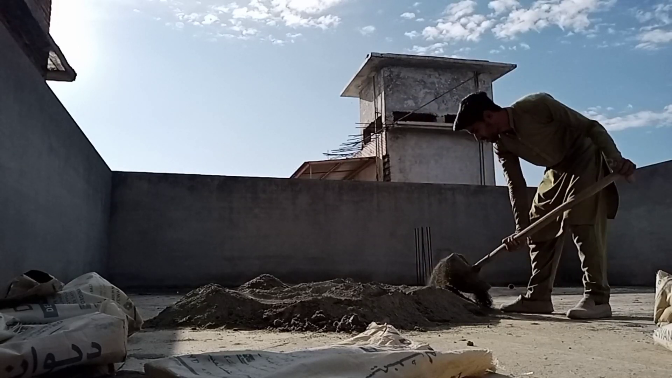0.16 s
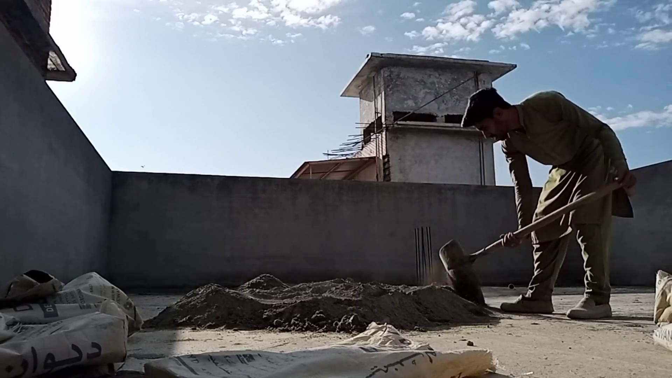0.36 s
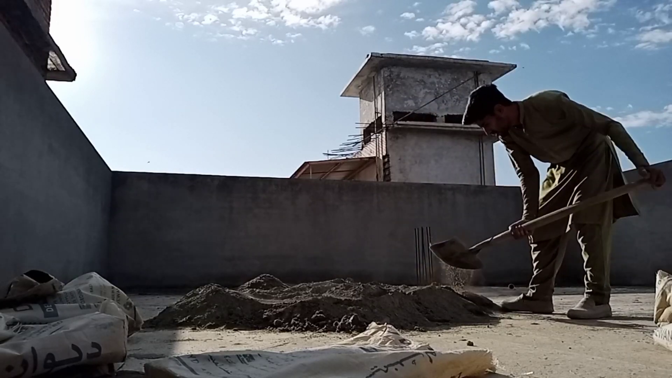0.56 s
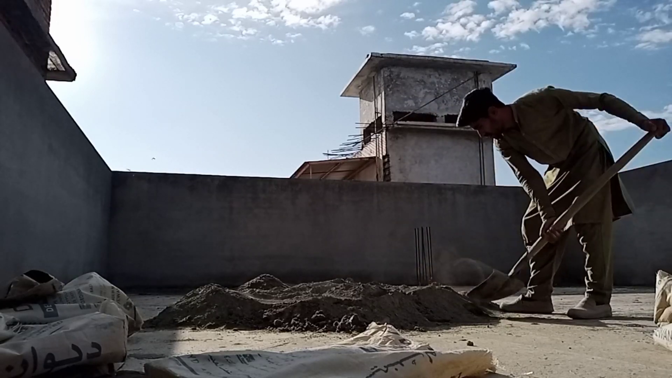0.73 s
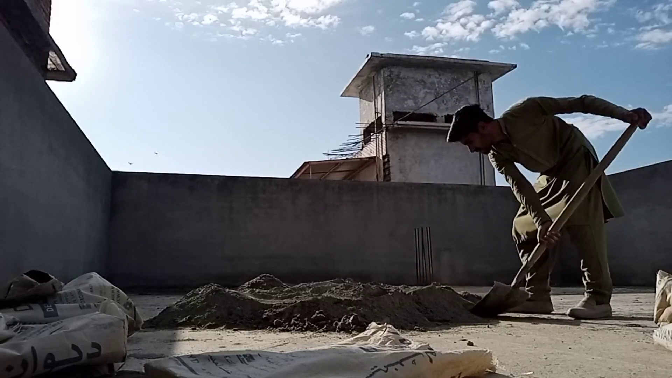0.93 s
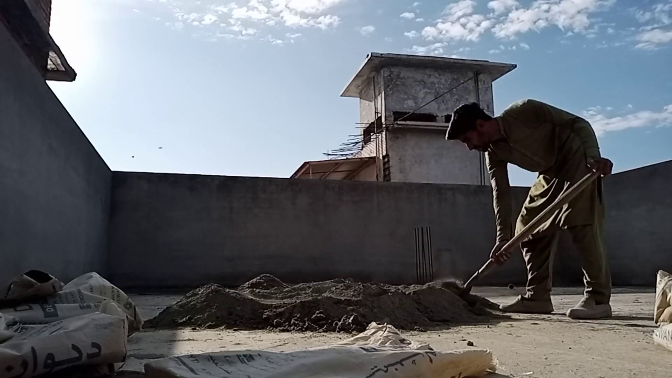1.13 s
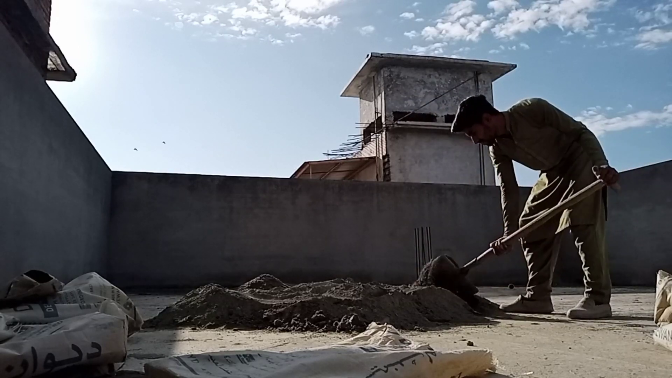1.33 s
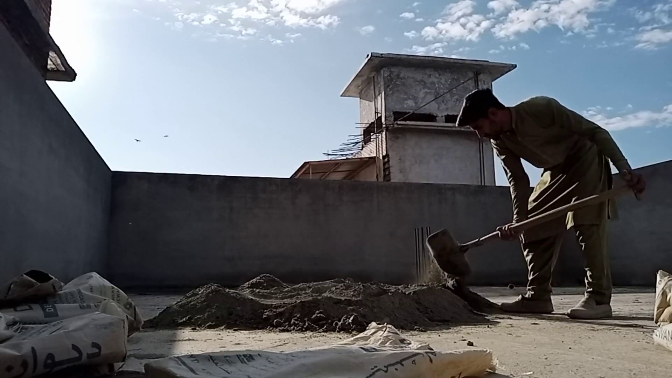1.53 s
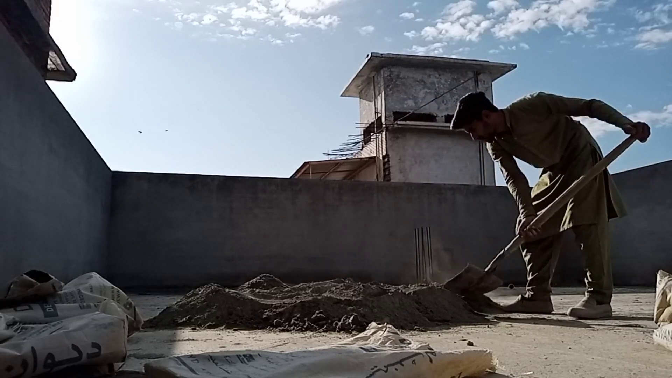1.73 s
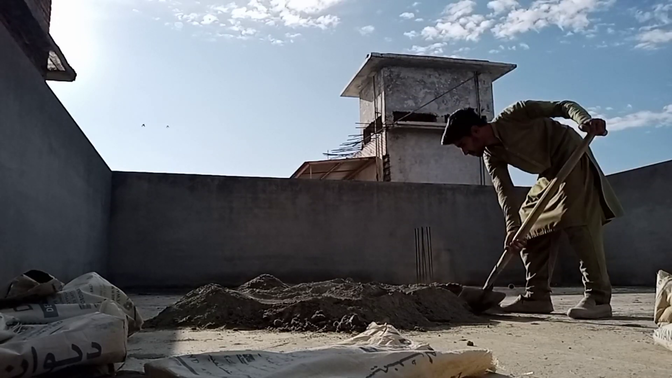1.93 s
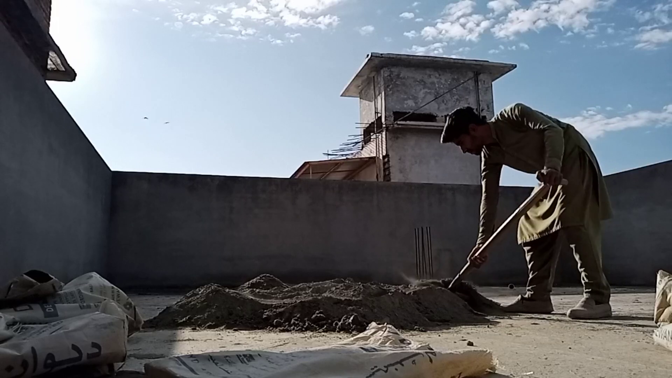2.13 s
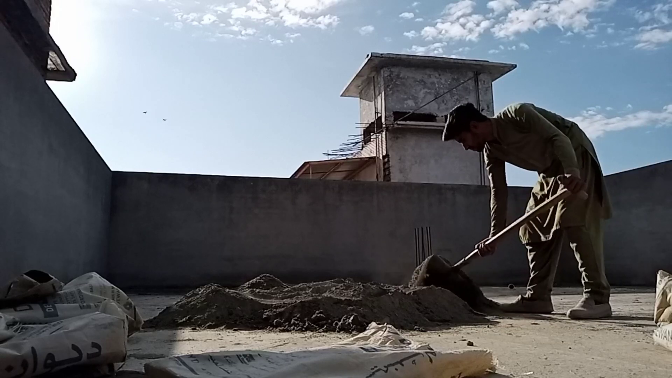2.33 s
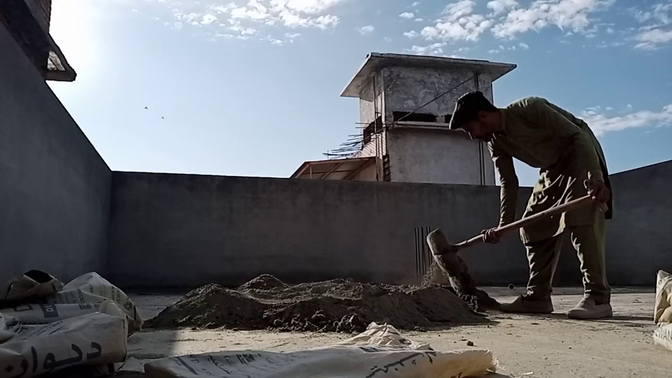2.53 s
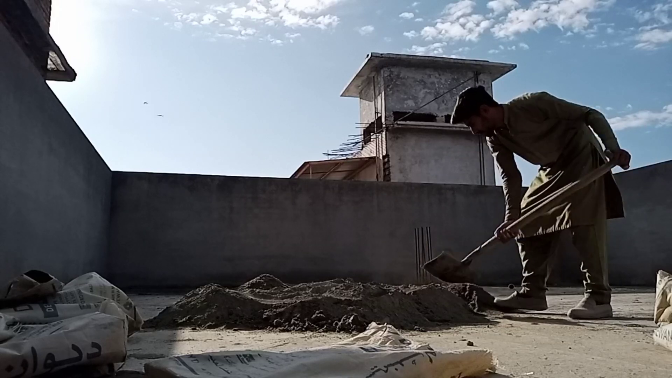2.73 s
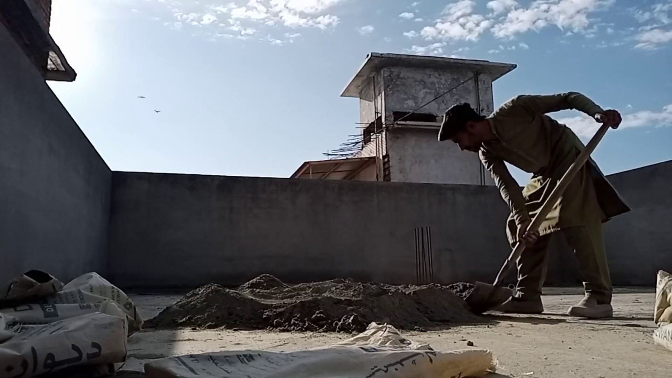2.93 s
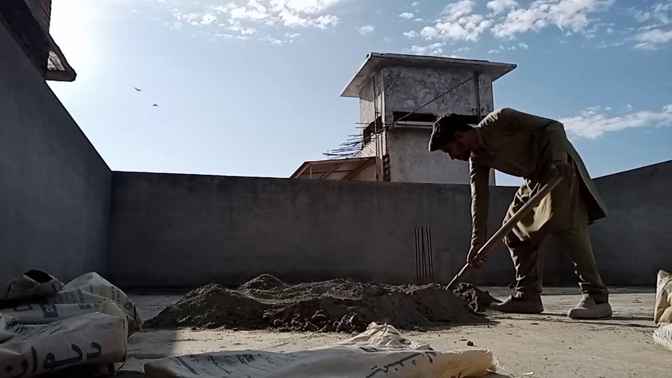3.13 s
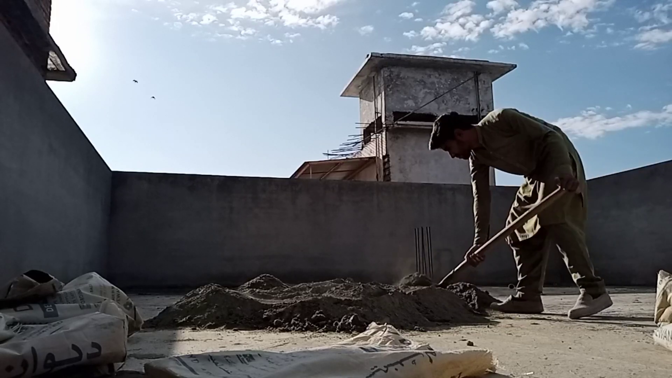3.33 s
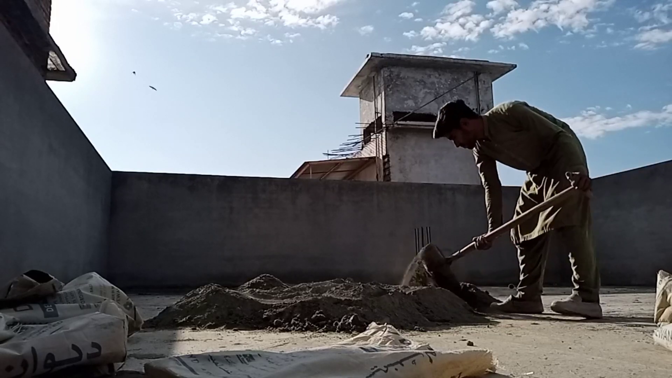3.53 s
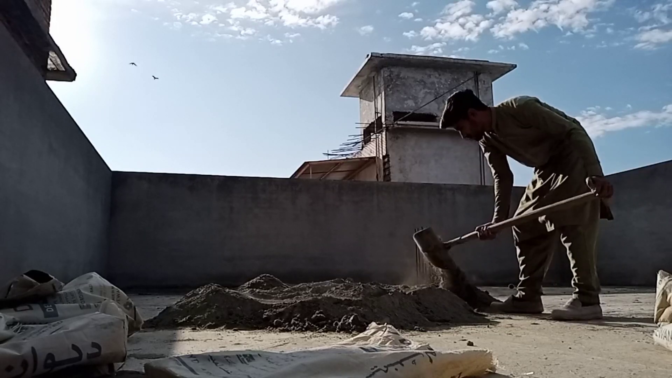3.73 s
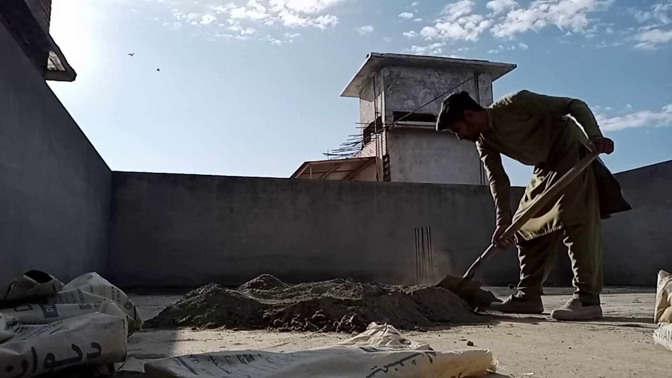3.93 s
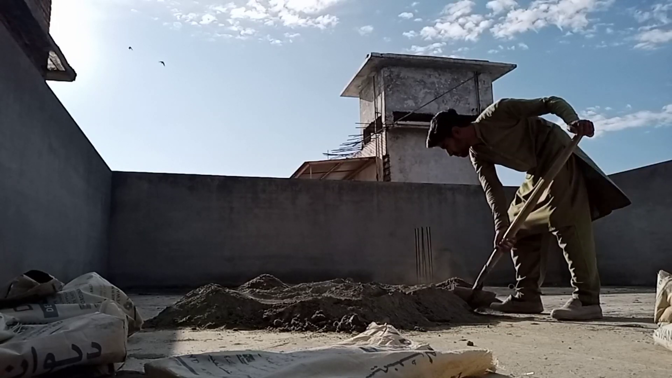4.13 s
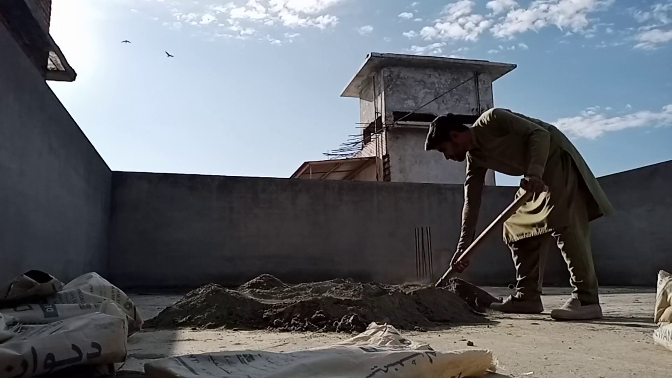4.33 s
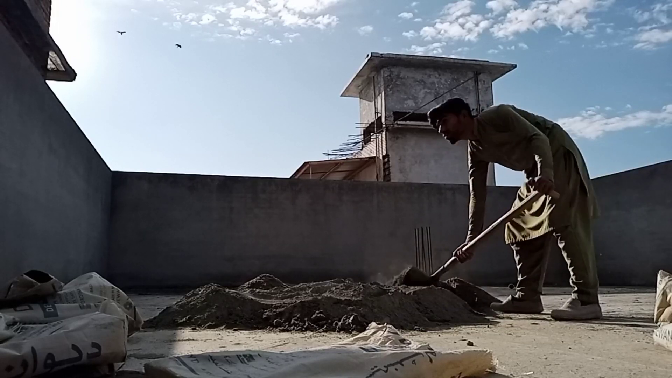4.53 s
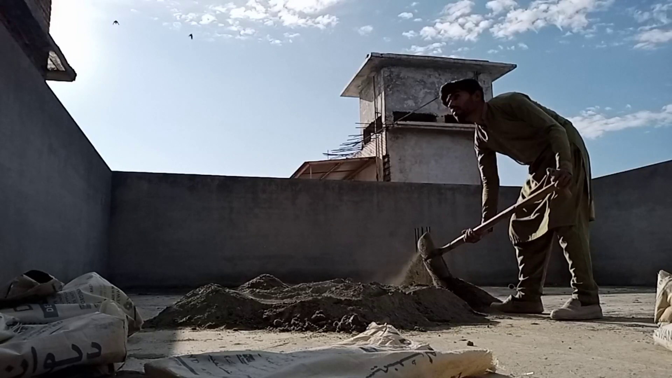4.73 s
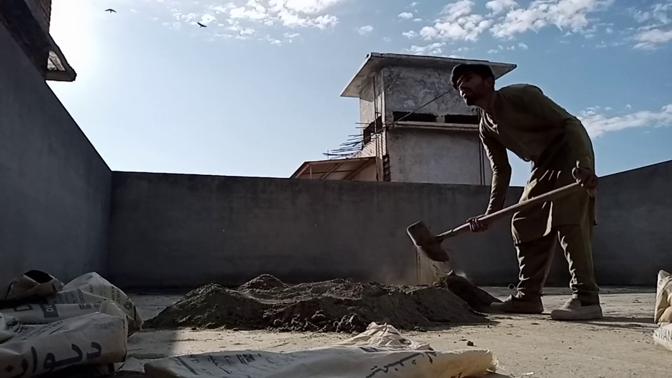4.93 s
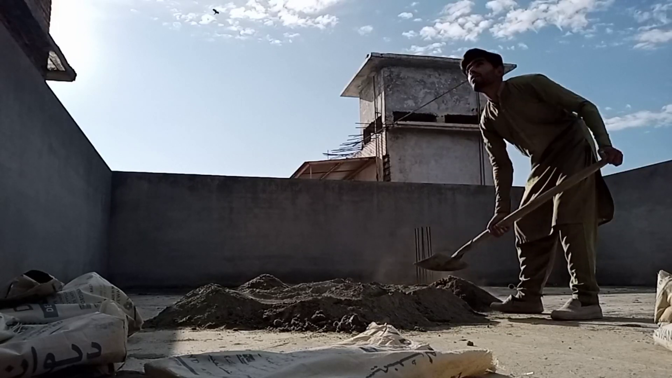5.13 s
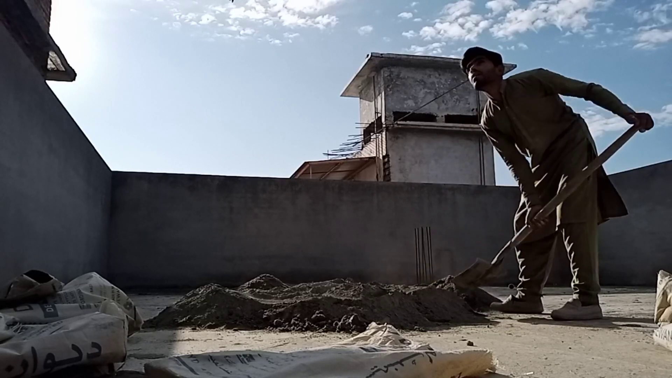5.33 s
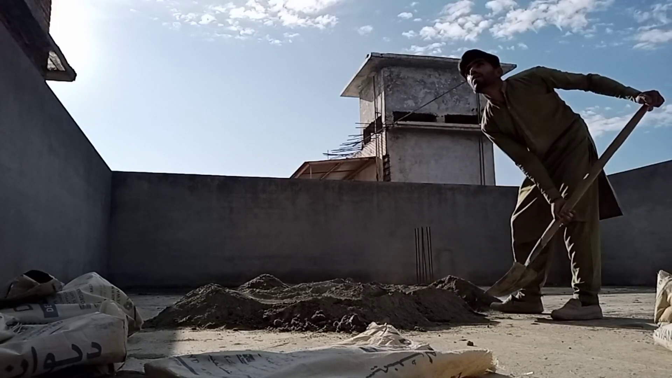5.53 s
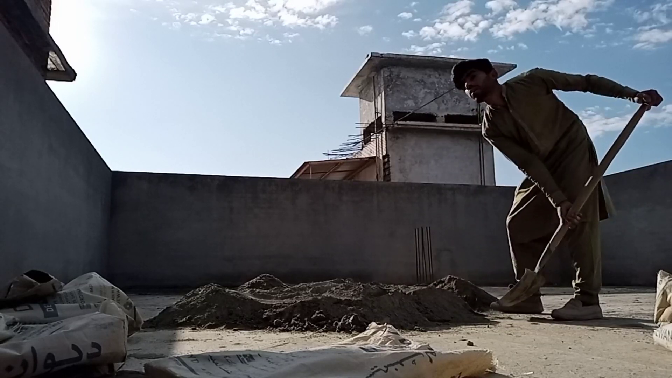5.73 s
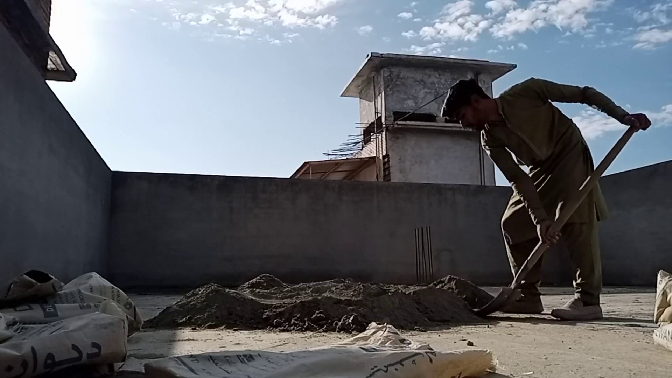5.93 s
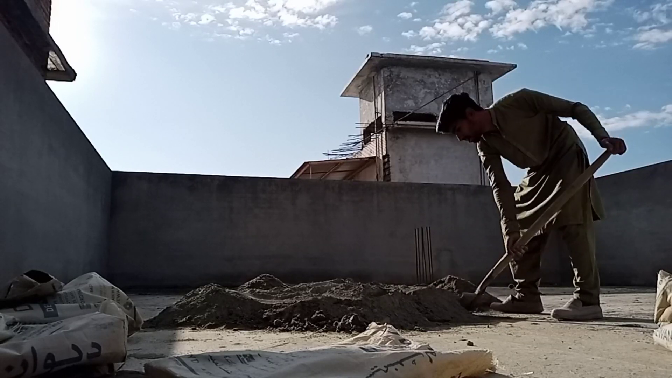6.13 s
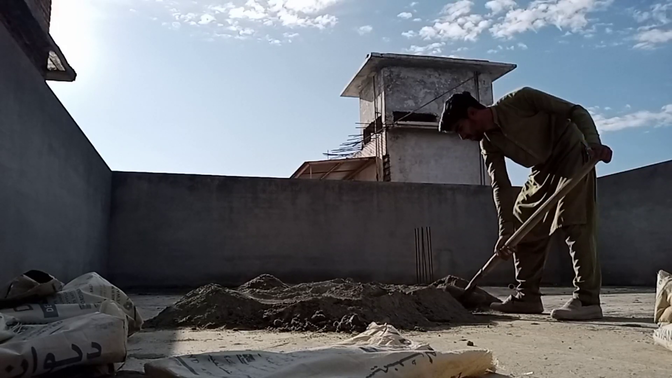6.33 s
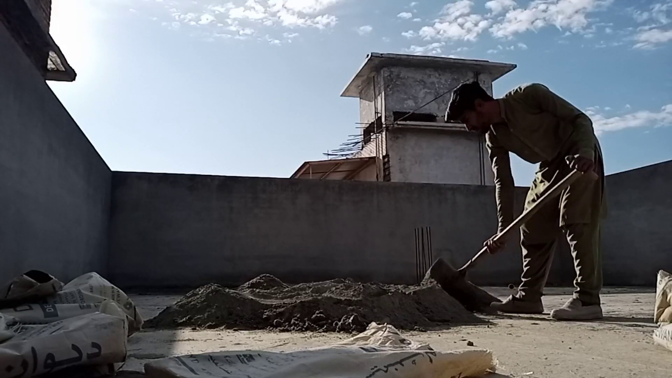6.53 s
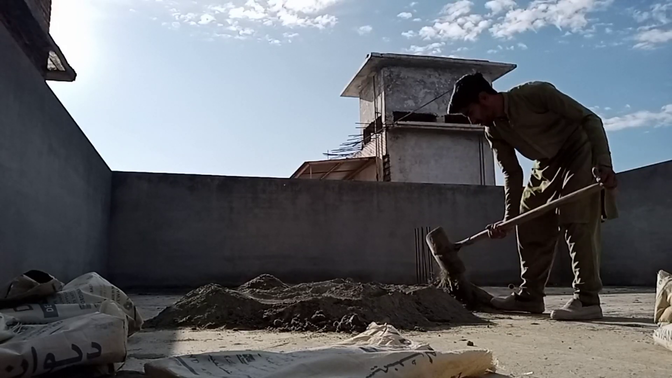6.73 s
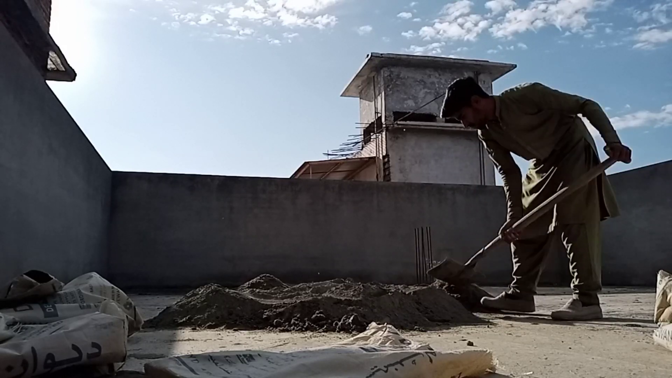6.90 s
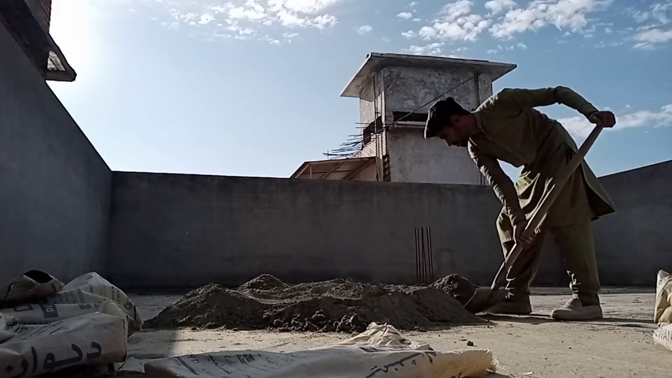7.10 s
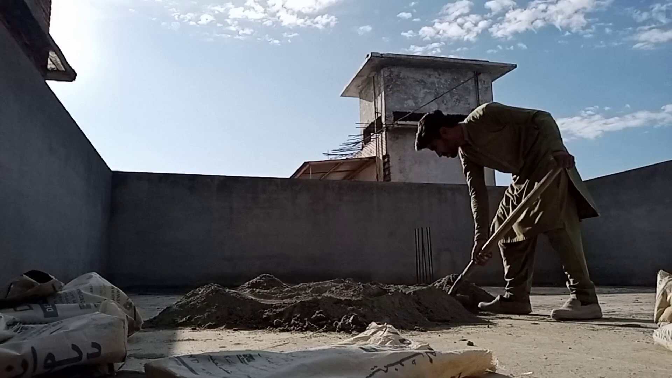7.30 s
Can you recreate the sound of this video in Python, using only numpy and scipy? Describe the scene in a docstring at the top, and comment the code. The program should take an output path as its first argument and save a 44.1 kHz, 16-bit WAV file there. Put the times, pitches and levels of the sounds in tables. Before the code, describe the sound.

A steel shovel scoops sand and cement on a concrete rooftop enclosed by low walls. The sound opens mid-scrape, dulling into crunch by 0.3 s, then sand slides off the blade around 0.4 s with a small knock. New strokes begin at about 0.9, 2.0, 3.0 and 4.2 s: a gritty metallic clack, a harsh bright rasp over concrete, then a darker grinding crunch as the blade enters the heap, with small stones snapping. Between them come hissing trickles and light ringing knocks near 1.5, 2.5, 3.65 and 4.8 s, the last with a faint falling squeak. After a quieter pause, strokes resume at 6.0 and 7.15 s, the final one landing with a sharper clack and cut off while scraping. Short dull wall slaps and a faint outdoor tail follow each scrape; low wind buffets over soft hush, slightly stronger around 6.7 s.

```python
"""A shovel clacks onto a walled concrete roof, rasps over it and dies in a dull crunch in sand and cement.
Sand then slides off the lifted blade; the parapet echoes, and light wind rumbles over a background hush.
Random grit impacts excite the steel blade's resonant modes; filtered grains make the sand and crunch.
Delays and decaying noise make the echoes; shaped noise makes the wind and the hush."""
import sys
import numpy as np
from scipy import signal
from scipy.fft import rfft, irfft, next_fast_len
from scipy.io import wavfile
from scipy.ndimage import uniform_filter1d, map_coordinates

SR = 44100
rng = np.random.default_rng(int(sys.argv[2]) if len(sys.argv) > 2 else 0)


def bounce(signal):
    """Save signal as a 16-bit WAV file at the path given by the first command-line argument."""
    frames = np.transpose(np.atleast_2d(signal))
    limited = np.clip(frames, -1, 1)
    pcm = np.round(limited * 32767).astype(np.int16)
    wavfile.write(sys.argv[1], SR, pcm)


N = 324576
TIME = np.arange(N) / SR


def from_db(db):
    """Amplitude ratio: 20 dB is a factor of ten."""
    return 10 ** (np.asarray(db) / 20)


def rms(x):
    """Effective amplitude: the root of the mean power."""
    return np.sqrt(np.mean(x ** 2) + 1e-20)


def band(x, low_hz, high_hz):
    """Band limitation: a Butterworth filter passes the range between two frequencies."""
    sos = signal.butter(2, [low_hz, high_hz], "band", fs=SR, output="sos")
    return signal.sosfilt(sos, x + 1e-18)


def split(x, hz):
    """Complementary filtering: the parts below and above a frequency sum to the whole."""
    below = signal.sosfiltfilt(signal.butter(3, hz, fs=SR, output="sos"), x)
    return below, x - below


def colour(x, spectrum):
    """Minimum-phase filtering: a causal filter with the given spectrum; white noise keeps its level."""
    size = 2 * next_fast_len(len(x) // 2 + 2048)
    hz, db = np.transpose(spectrum)
    bins_hz = np.arange(size // 2 + 1) * SR / size
    gain = from_db(np.interp(np.log(bins_hz + 1), np.log(hz), db))
    # folding the cepstrum onto positive times makes the filter causal
    cepstrum = irfft(np.log(gain / rms(gain)))
    cepstrum[1:size // 2] *= 2
    cepstrum[size // 2 + 1:] = 0
    return irfft(rfft(x, size) * np.exp(rfft(cepstrum)))[:len(x)]


def drift(t, rate):
    """Slow random modulation: straight lines join normal values of spread 1, drawn rate times a second."""
    knots = rng.standard_normal(4096)
    return np.interp((t - t[0]) * rate, np.arange(len(knots)), knots)


def grains(t, per_s, spread_db):
    """Shot noise: clicks of random time, sign and size add up to a rough sound of rms 1."""
    sizes = from_db(spread_db * np.minimum(rng.exponential(1, len(t)), 5))
    signs = rng.choice([-1, 1], len(t))
    clicks = sizes * signs * (rng.random(len(t)) < per_s / SR)
    return clicks / rms(clicks)


def click(s, db):
    """Impulse excitation: one hard contact lasts a single sample."""
    return from_db(db) * signal.unit_impulse(N, int(s * SR))


def burst(s, db, t60):
    """Exponential decay: a contact breaks up into noise that falls 60 dB in t60 seconds."""
    out, start = np.zeros(N), int(s * SR)
    age = TIME[:min(N - start, SR // 5)]
    out[start:start + len(age)] = rng.standard_normal(len(age)) * from_db(db - 60 * age / t60)
    return out


def swell(s, half_s):
    """Amplitude envelope: a flat-topped rise and fall, at half height half_s from its middle."""
    return 1 / (1 + np.abs((TIME - s) / half_s) ** 7)


def place(x, s):
    """Translation in time: a sound is set to start at a given moment."""
    return np.interp(np.arange(N) - int(s * SR), np.arange(len(x)), x, left=0, right=0)


def resonance(x, hz, width_hz):
    """Resonance: one damped mode, with gain 1 at its top."""
    radius, angle = np.exp(-np.pi * width_hz / SR), 2 * np.pi * hz / SR
    zeros = np.array([1, 0, -1]) * (1 - radius * radius) / 2
    poles = [1, -2 * radius * np.cos(angle), radius * radius]
    return signal.lfilter(zeros, poles, x + 1e-18)


def bend(x, share):
    """Frequency modulation by a moving time base: changing pressure on the edge bends a mode's pitch."""
    steps = np.arange(len(x))
    ahead = signal.lfilter([1], [1, -.9995], share * drift(steps / SR, rate=18))
    return map_coordinates(x, [steps + ahead], order=2)


def floor_bounce(x, t, share):
    """Comb filtering: sound bounced between floor and blade returns ever later, so its notches sweep."""
    for first_s in rng.uniform([.0009, .0022], [.0015, .0036]):
        delay_s = first_s * (1 + .25 * t)
        x = x + share * np.interp(t - delay_s, t, x, left=0)
    return x


# Wind rumble on the microphone, before a small trim. Each row: time in seconds, level in dB.
WIND = [(0.0, -92), (0.04, -73), (1.56, -55.5), (1.64, -66), (3.5, -71), (3.62, -56), (3.76, -74),
        (4.48, -57), (4.64, -73.5), (4.74, -59.5), (5.38, -69.5), (5.44, -56.5), (6.14, -70.0), (6.26, -60),
        (6.38, -78.5), (6.54, -61), (6.64, -73.5), (7.34, -69)]
# Background hush, louder after the sixth stroke. Each row: time in seconds, level in dB.
HUSH = [(0, -71), (1.8, -72.5), (2.7, -71), (3.9, -70.5), (5.2, -73), (5.8, -72), (6.7, -65), (7.1, -68.5)]
# Spectrum of the wind rumble. Each row: frequency in Hz, relative density in dB per Hz.
RUMBLE = [(20, -20.5), (45, -21), (62, -5.5), (73, 3.5), (86, -2.5), (100, -1.5), (130, -13), (200, -26),
          (500, -59.5)]
# Spectrum of the background hush. Each row: frequency in Hz, relative density in dB per Hz.
HUSH_SPECTRUM = [(60, -13.5), (120, -2), (260, -7), (450, -13), (770, -12.5), (1400, -17.5), (2000, -17),
                 (3400, -19.5), (5500, -26.5), (8000, -40), (16000, -44)]


def air():
    """Turbulence and steady noise: buffeting wind lies over a background hush whose level changes slowly."""
    rumble = colour(rng.standard_normal(N), RUMBLE)
    rumble /= np.sqrt(uniform_filter1d(rumble ** 2, size=6000))
    # quick swings of 4 dB spread around the wind's level
    wind_db = np.interp(TIME, *np.transpose(WIND)) + 4 * drift(TIME, rate=16) - 1.25
    hush_db = np.interp(TIME, *np.transpose(HUSH))
    hush = from_db(hush_db) * colour(rng.standard_normal(N), HUSH_SPECTRUM)
    return from_db(wind_db) * rumble + hush


# Echoes off the parapet walls. Each row: delay in seconds, gain in dB.
WALLS = [(0.0125, -10.5), (0.03, -18.5), (.047, -9), (0.067, -19.5)]


def rooftop(x, far_db=-33, far_t60=1.286):
    """Reflection and reverberation: dull parapet slaps, then a faint long wash from the houses around."""
    dull = band(x, 130, 5800)
    slaps = sum(from_db(db) * np.interp(TIME - delay_s, TIME, dull, left=0) for delay_s, db in WALLS)
    age = TIME[:2 * SR]
    wash = band(rng.standard_normal(len(age)), 230, 4000) * from_db(-60 * age / far_t60)
    wash /= np.sqrt(np.sum(wash ** 2))
    return slaps + from_db(far_db) * signal.fftconvolve(dull, wash)[:N]


# Faint squeaks. Each row: start in seconds, length in seconds, mean pitch at the start in Hz,
# mean pitch at the end in Hz, peak level in dB.
SQUEAKS = [(4.004, 0.02, 3147, 2764, -61), (4.834, .075, 3020, 2780, -63), (4.908, .035, 2630, 2376, -73.5)]


def squeaks():
    """Frequency modulation: short falling tones waver at random in pitch."""
    out = np.zeros(N)
    for s, length_s, start_hz, end_hz, db in SQUEAKS:
        where = (TIME > s) & (TIME < s + length_s)
        t = TIME[where]
        falling_hz = np.interp(t, [s, s + length_s], [start_hz, end_hz])
        hz = falling_hz * (1 + 0.017 * drift(t, rate=440))
        out[where] += from_db(db) * np.hanning(len(t)) * np.sin(2 * np.pi * np.cumsum(hz) / SR)
    return out


# Modes of the steel blade. Each row: frequency in Hz, width in Hz before the damping factor,
# relative drive in dB when pressed to the floor, relative drive in dB when lifted.
BLADE = [(380, 47, 6.5, -17.5), (505.7, 21, -1, -7.5), (700, 78, 7, 7.5), (846, 22, -4.5, -14.5),
         (1040, 71, -1.5, 3), (1167, 65, 3.5, -11), (1390, 28, 4.5, 1), (1638, 93, 5.5, 0),
         (1890, 85, 1.5, 9), (2124, 26, 1.5, -4), (2398, 72, 0, 2.5), (2492, 81, 1, -8.5),
         (2750, 200, -0.5, 5), (2975, 65, -2.5, 4), (3074, 100, 1.5, -1.5), (3306.5, 38, 1.5, 8.5),
         (3775, 180, -0.5, -2.5), (4110, 120, -0.5, 2), (4440, 83, -0.5, 2.5), (4800, 58, -7.5, 3),
         (5390, 59, -2, -5.5), (5570, 160, -10, -0.5), (5900, 80, -5, -4.5), (6550, 80, 1.5, -4.5),
         (6740, 75, -8.5, 3.5), (9300, 130, -2, -2.5)]


def blade(force, lifted=False, damping=1, flex=None, wander_db=0):
    """Modal superposition: as the point of contact wanders, each mode is driven now more, now less."""
    out, t = 0, TIME[:len(force)]
    for hz, width_hz, pressed_db, lifted_db in BLADE:
        mode_db = lifted_db if lifted else pressed_db
        drive = from_db(mode_db + wander_db * drift(t, rate=22))
        ring = resonance(force * drive, hz, width_hz * damping)
        out = out + (ring if flex is None else bend(ring, flex))
    return out


# Crumbs ticking on the lifted blade. Each row: time in seconds, relative drive in dB,
# 60 dB decay of the contact in seconds.
TICKS = [(0.4643, -41, 0.027), (.8204, -42.5, 0.032), (2.707, -54.5, .04), (2.841, -41, 0.091),
         (2.9098, -50, .05), (3.5858, -31, .03), (4.0104, -50, 0.022), (4.817, -32.5, 0.057)]
# Sand sliding off the blade, one swell per throw. Each row: time of the top in seconds,
# half length in seconds, relative drive in dB, top hiss at 14 to 16 kHz relative to the pour in dB.
POURS = [(.41, 0.08, -50.5, -8), (1.495, 0.044, -56.5, -4), (2.493, 0.055, -63, -16),
         (3.628, 0.049, -53.5, -12), (4.797, 0.043, -49.5, -26), (6.69, 0.054, -65.5, -10.5)]
# Spectrum of the sliding. Each row: frequency in Hz, relative density in dB per Hz.
SLIDE = [(300, -27.5), (1000, -14.5), (2000, -7.5), (4000, -3.5), (6000, -0.5), (8000, -10), (13000, -12.5),
         (15200, -2)]


def sliding_sand():
    """Granular excitation: off the floor the blade rings under sliding sand and falling crumbs."""
    force = from_db(-12.0) * sum(burst(s, db, t60) for s, db, t60 in TICKS)
    top_hiss = 0
    t = TIME[:SR // 2]
    for s, half_s, db, top_hiss_db in POURS:
        trickle = grains(t, per_s=2400, spread_db=3.5) * from_db(2.4 * drift(t, rate=55))
        trickle = place(floor_bounce(trickle, t, share=0.38), s - t.mean())
        pour = from_db(db - 7.0) * swell(s, half_s) * trickle
        force = force + pour
        top_hiss = top_hiss + from_db(top_hiss_db) * pour
    ringing = blade(force, lifted=True, damping=0.75, wander_db=4.0)
    sliding = colour(from_db(-9.0) * force + from_db(4.5) * ringing, SLIDE)
    return sliding + band(top_hiss, 14000, 16000)


# Knocks of the loaded blade as it leaves the heap. Each row: time in seconds, relative drive in dB,
# low edge of the driven band in Hz.
KNOCKS = [(0.469, -55, 1500), (1.499, -53, 1212), (2.499, -38.5, 600), (3.65, -62, 1510),
          (4.786, -45, 1004), (4.823, -56, 1500)]


def knocks():
    """Free vibration: a band-limited knock leaves the lightly damped blade ringing long."""
    force = sum(band(click(s, db), low_hz, 1900) for s, db, low_hz in KNOCKS)
    return from_db(41) * blade(force, lifted=True, damping=0.16)


# Small stones cracking under the blade. Each row: time in seconds, relative drive in dB.
STONES = [(1.069, -14), (1.088, -18), (1.111, -13), (1.124, -11), (2.129, -15.5), (3.184, -12),
          (4.313, -28.5), (6.083, -22), (6.103, -17.5), (6.288, -19)]
# Spectrum of the cracks. Each row: frequency in Hz, relative density in dB per Hz.
CRACK = [(150, -21), (400, -1.5), (1500, 15), (4000, 1), (6500, -3), (9000, -70), (15000, -30.5)]


def stones():
    """Impulse response: each stone gives a single dry snap."""
    return from_db(8.0) * colour(sum(click(s, db) for s, db in STONES), CRACK)


# The blade landing or skipping on the floor. Each row: time in seconds, relative drive in dB,
# 60 dB decay of the contact in seconds, clang frequency in Hz.
LANDINGS = [(.920, -21, .034, 4300), (.932, -21.5, .04, 5900), (0.947, -17, .04, 4400),
            (1.971, -20, 0.094, 1700), (3.016, -23.5, 0.089, 4100), (3.037, -20, .03, 3100),
            (3.065, -17.5, .072, 3050), (4.167, -25, 0.086, 1750), (5.976, -23, 0.11, 2700),
            (6.036, -14.5, .03, 4000), (7.150, -10.5, .05, 4200), (7.180, -18, .06, 3000),
            (7.204, -17.5, 0.099, 1600), (7.244, -17, .03, 2950)]
# Spectrum of steel on concrete. Each row: frequency in Hz, relative density in dB per Hz.
RASP = [(150, -44), (240, -40), (320, -6), (450, -31), (800, -6.5), (1300, -1), (1800, 0.5), (3000, 0),
        (4300, -1), (6000, -4.5), (7500, -18.5), (10000, -30), (13500, -35.5), (15200, -22.5)]


def landings():
    """Impact excitation: the edge clangs down on the concrete and sets off the pressed blade's modes."""
    force = 0
    for s, db, t60, clang_hz in LANDINGS:
        contact = burst(s, db, t60)
        force = force + contact + from_db(3.5) * resonance(contact, clang_hz, 290)
    clang = force + from_db(-1.0) * blade(force, wander_db=1.0)
    return from_db(-10.0) * colour(band(clang, 660, 16000), RASP)


# Spectrum of the heap's thud. Each row: frequency in Hz, relative density in dB per Hz.
THUD = [(50, -31), (110, -7), (150, 0), (230, -2), (400, -2.5), (1500, -56)]


def heap(t, meets_s):
    """Plastic yielding: the mass of sand gives way with a soft thud, at its height 0.055 s after contact."""
    pushed = np.maximum(t - meets_s, 0) / .055
    return pushed * np.exp(1 - pushed) * colour(grains(t, per_s=910, spread_db=0.0), THUD)


# Spectrum of the sand's crunch. Each row: frequency in Hz, relative density in dB per Hz.
CRUNCH = [(120, -28.5), (230, -19), (330, 1.5), (480, 4), (750, 2.5), (1100, 1), (1800, -6.5),
          (3500, -23.5), (8000, -69.5)]


def crunch(t, judder, scoop_hz, scoop_db):
    """Granular friction with cavity resonance: sand grinds in the hollow of the scoop, with some gravel."""
    sand = floor_bounce(grains(t, per_s=2000, spread_db=3.0) * judder, t, share=0.26)
    sand = colour(sand + from_db(scoop_db) * resonance(sand, scoop_hz, 130), CRUNCH)
    gravel = colour(grains(t, per_s=350, spread_db=-2.5), CRACK)
    return sand / rms(sand) + from_db(-8) * gravel


def steel_rasp(t, grit, load_db, rings, length_s):
    """Damping by load: grit drives the blade, piled sand muffles it, and it rings again as it lifts."""
    free = from_db(-.55 * np.clip(load_db + 15.0, 0, 18))
    lifting = from_db(-110 * np.maximum(length_s + 0.054 - t, 0))
    steel = grit + from_db(4.0) * free * blade(grit, damping=0.87, flex=.003, wander_db=1.0)
    steel = steel + from_db(3) * lifting * blade(grit, lifted=True, damping=3.5, wander_db=2.5)
    low_hz, low_db, high_hz, high_db = rings
    biting = free * from_db(-45 * np.maximum(t - .12, 0))
    low_ring = from_db(low_db) * resonance(steel, low_hz, 170)
    high_ring = from_db(high_db) * resonance(steel, high_hz, 380)
    steel = steel + biting * (low_ring + high_ring)
    steel = colour(floor_bounce(steel, t, share=.15), RASP)
    # an even level in the middle band leaves the loudness to the stroke
    return steel / np.sqrt(uniform_filter1d(band(steel, 1000, 3500) ** 2, size=1500) + 1e-9)


STROKE_S = .8  # time computed for each stroke
FILL_S, FILL_DB = 0.071, 13.5  # sand builds up until this long after meeting the heap, by this much
DULL_S, DULL_DB = .22, 10.5  # the edge is buried this long after meeting the heap, duller by this much
RELEASE_DB_PER_S = 243  # fall as the blade leaves the floor
UNEVEN_DB, UNEVEN_PER_S = 1.0, 28  # the push is never quite steady

# Shovel strokes; the blade's angle sets the scoop's hollow and the two rings that the biting edge favours.
# Each row: start in seconds, glide to the heap in seconds, length in seconds, rasp drive in dB,
# swell during the glide in dB, fade in the heap in dB per second, sand relative to rasp in dB,
# edge relative to rasp in dB before a trim, thud in dB, hollow in Hz, hollow in dB,
# lower ring in Hz, lower ring in dB, upper ring in Hz, upper ring in dB.
STROKES = [ (-.265, 0.11, 0.6, -24.5, 6, 98, -.5, .5, -48, 253, 2, 1207, 13, 4300, -3),
           (.921, 0.12, 0.61, -22.5, 11, 77, -11, 3, -51, 330.8, 0, 2887, 1.5, 4330, -0.5),
           (1.971, 0.083, 0.6, -22.5, 1.5, 77, -7.5, -1, -58.5, 693, -4, 1850, -4, 3100, -3.5),
           (3.018, 0.11, 0.48, -24, 8, 76, -5, 2, -57.5, 387.6, 4, 1663, -8.5, 3087, 1.5),
           (4.168, 0.15, .57, -24.5, 9, 79.5, 0, 1, -41, 387, -1, 1680, -1, 2960, 0),
           (5.978, .24, .52, -25.5, 0, 103.5, -4, 2.5, -60, 663, -8, 2740, 2.5, 3970, -2.5),
           (7.152, .15, 0.49, -23, 23, 55, -2, 0.5, -59, 345, -14, 1270, -10, 2970, 7.5)]


def stroke(s, glide_s, length_s, top_db, swell_db, fade_db_per_s, sand_db, bright_db, thud_db,
           scoop_hz, scoop_db, *rings):
    """Sliding friction: the juddering edge rasps over concrete, then brakes and dulls in crunching sand."""
    t = TIME[:int(STROKE_S * SR)]
    in_heap_s = np.maximum(t - glide_s, 0)
    gate = np.minimum(t / .002, 1) * from_db(-RELEASE_DB_PER_S * np.maximum(t - length_s, 0))
    rasp_db = top_db - swell_db * np.maximum(1 - t / glide_s, 0) ** 2 - fade_db_per_s * in_heap_s
    rasp_db = rasp_db + UNEVEN_DB * drift(t, rate=UNEVEN_PER_S)
    load_db = sand_db - FILL_DB * np.maximum(1 - (t / (glide_s + FILL_S)) ** 2, 0)
    edge_db = bright_db - DULL_DB * np.minimum(t / (glide_s + DULL_S), 1) ** 1.2
    judder = from_db(1.2 * drift(t, rate=130) + 2.1 * drift(t, rate=600))
    # the grit thins out from the start of each stroke
    per_s = 2200 + 11000 * from_db(-40 * t)
    grit = grains(t, per_s, spread_db=0.5) * judder
    body, edge = split(steel_rasp(t, grit, load_db, rings, length_s), 3550)
    edge = edge / rms(band(edge, 3600, 8000))
    # the highest hiss grows and fades faster than the rest of the scrape
    edge, fine = split(edge, 7400)
    edge = edge + fine * from_db(0.5 * np.clip(rasp_db + edge_db + 33.5, -30, 4))
    steel = from_db(-1.0) * body + from_db(edge_db - 4.0) * edge
    sand = from_db(load_db) * crunch(t, judder, scoop_hz, scoop_db)
    scrape = gate * from_db(rasp_db) * (steel + sand)
    return place(scrape + from_db(thud_db) * heap(t, glide_s), s)


def scene():
    """Superposition: the shovel, its echoes and the open air add up."""
    shovel = squeaks() + sliding_sand() + knocks() + stones() + landings()
    shovel = shovel + sum(stroke(*row) for row in STROKES)
    return (air() + rooftop(shovel) + shovel)[None]


def record(dry):
    """Saturation and band limitation: tall peaks are rounded and the top is cut steeply at 15650 Hz."""
    rounded = dry / (1 + (dry / .33) ** 6) ** (1 / 6)
    return signal.sosfilt(signal.ellip(12, .2, 80, 15650, fs=SR, output="sos"), rounded)


dry = scene()
out = record(dry)
bounce(out)
```